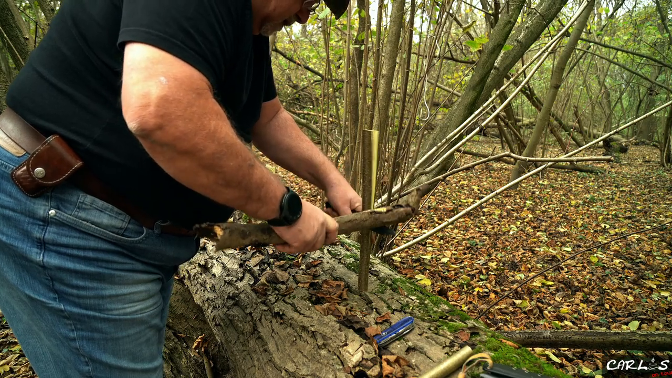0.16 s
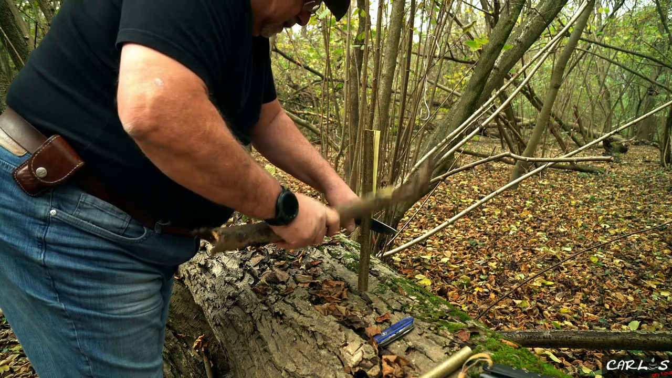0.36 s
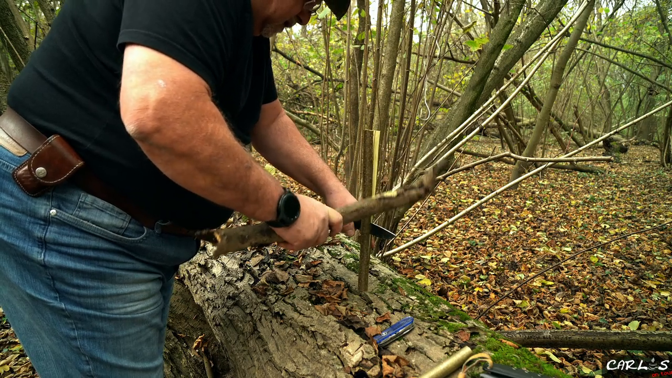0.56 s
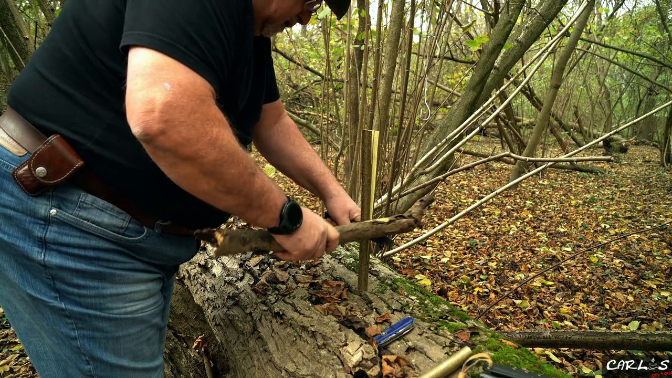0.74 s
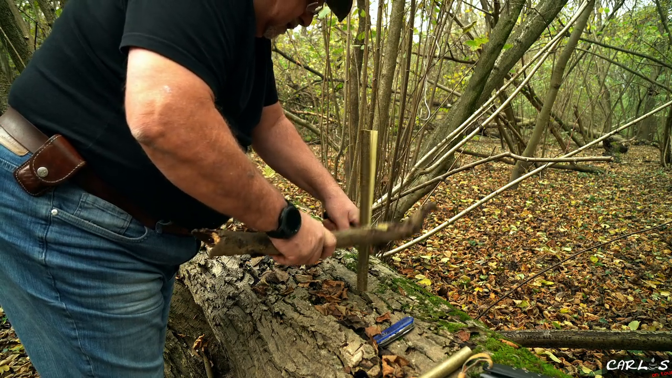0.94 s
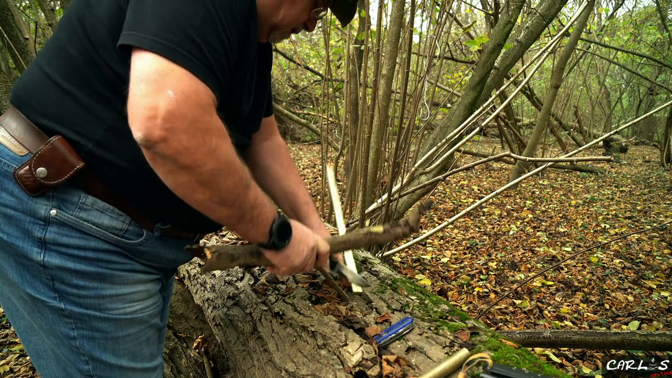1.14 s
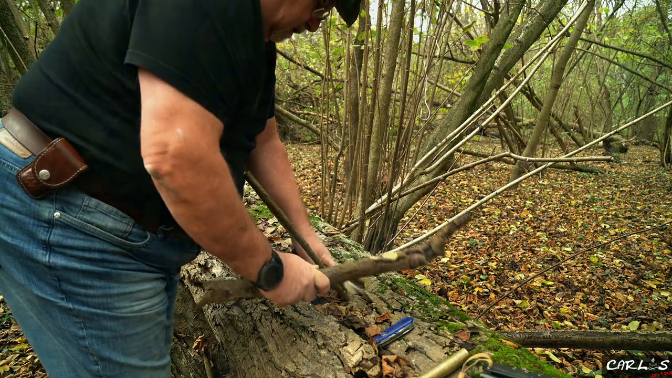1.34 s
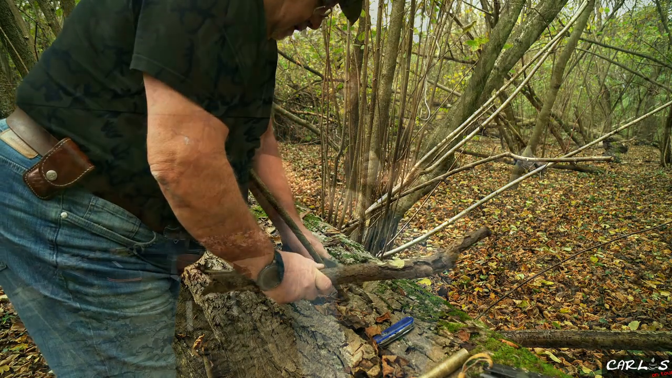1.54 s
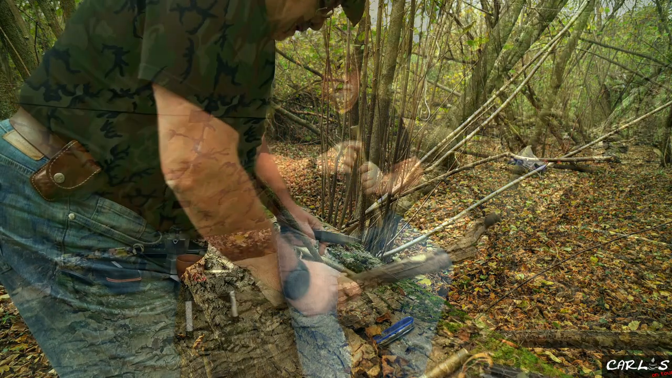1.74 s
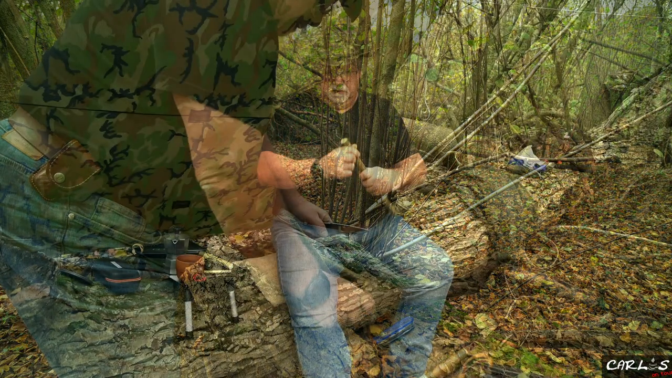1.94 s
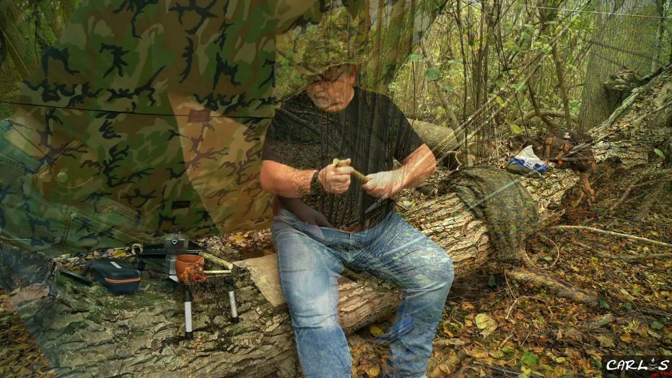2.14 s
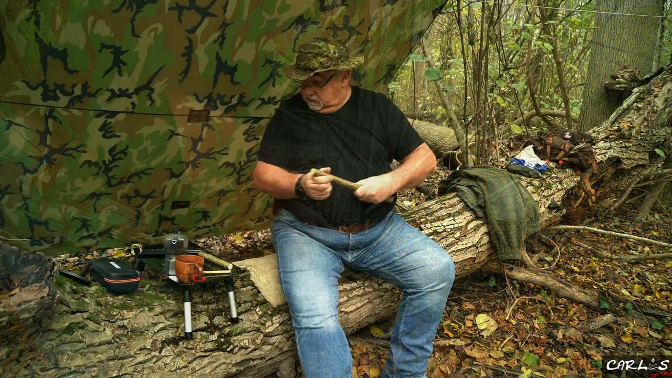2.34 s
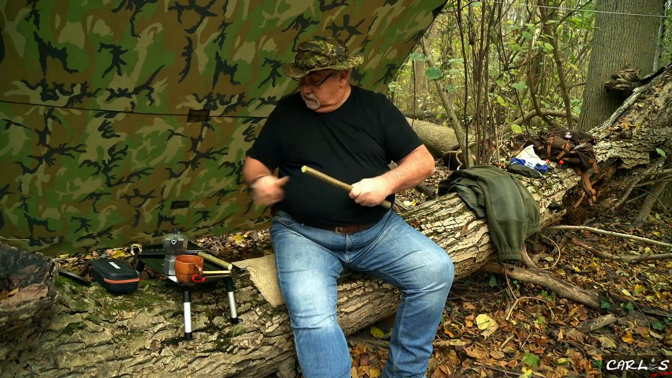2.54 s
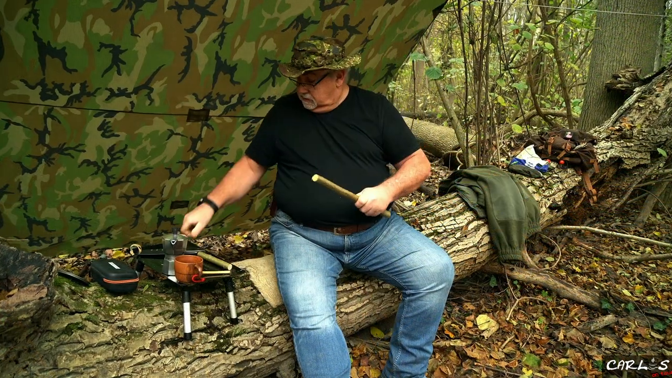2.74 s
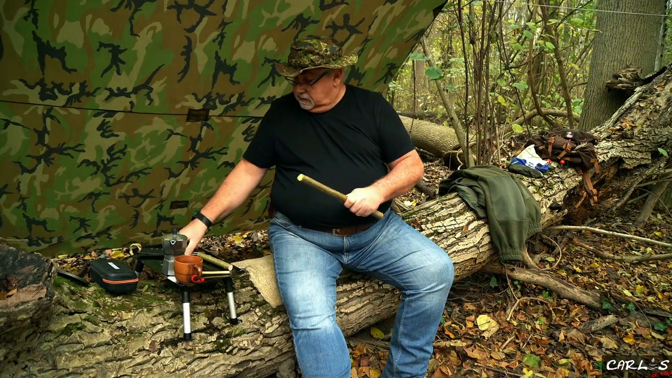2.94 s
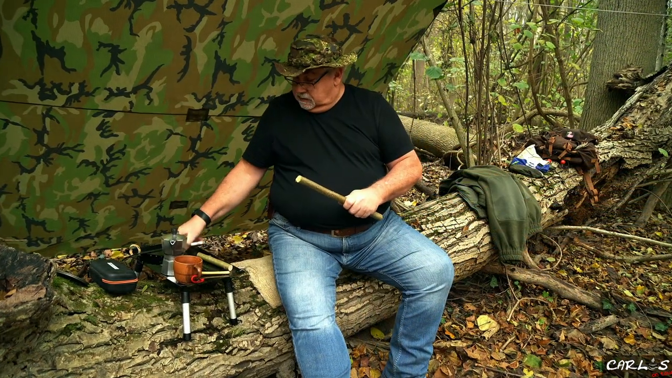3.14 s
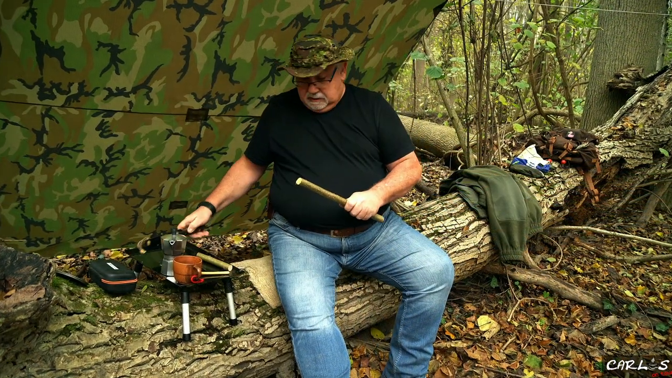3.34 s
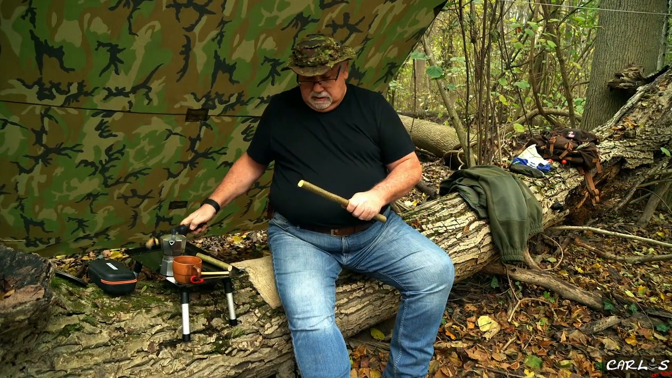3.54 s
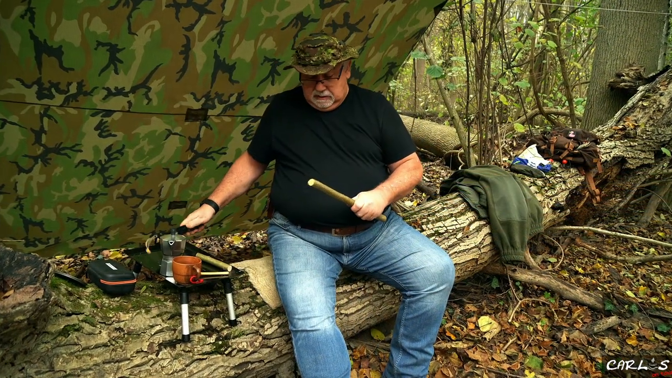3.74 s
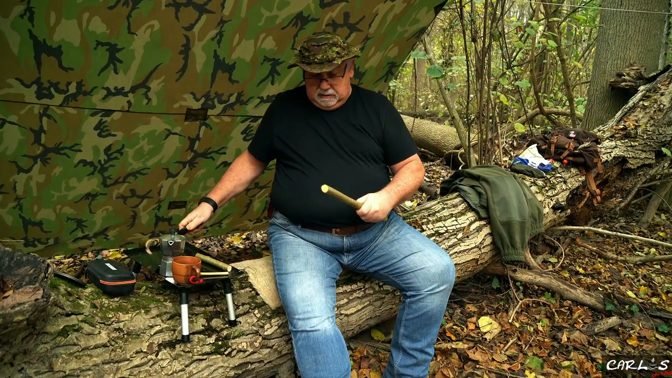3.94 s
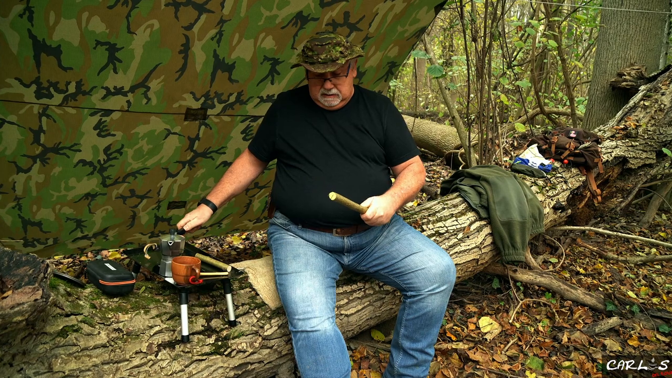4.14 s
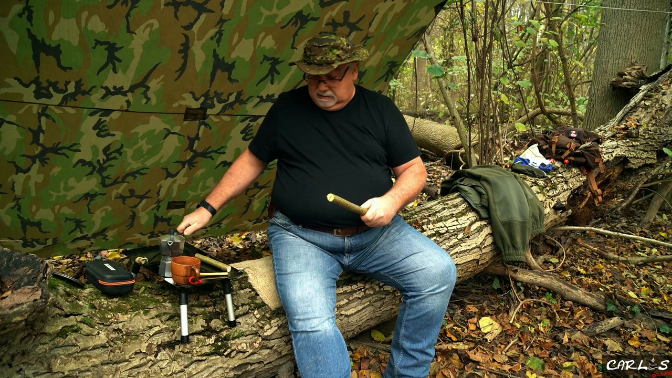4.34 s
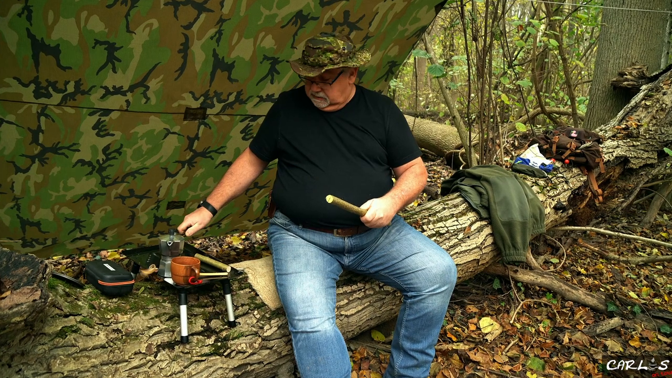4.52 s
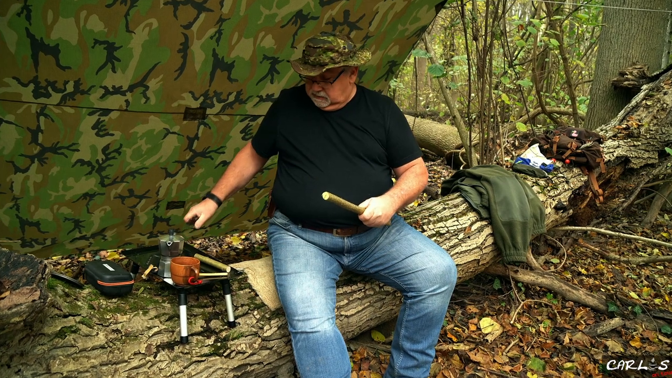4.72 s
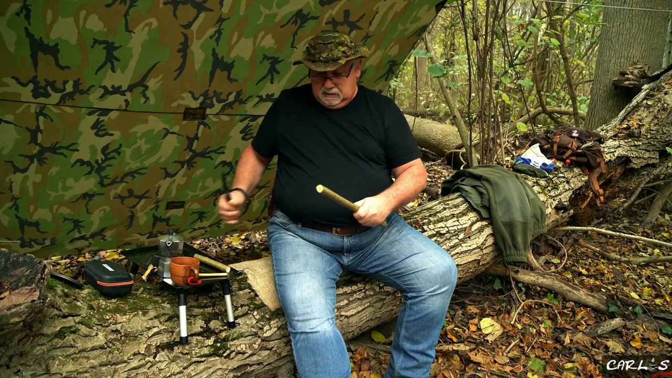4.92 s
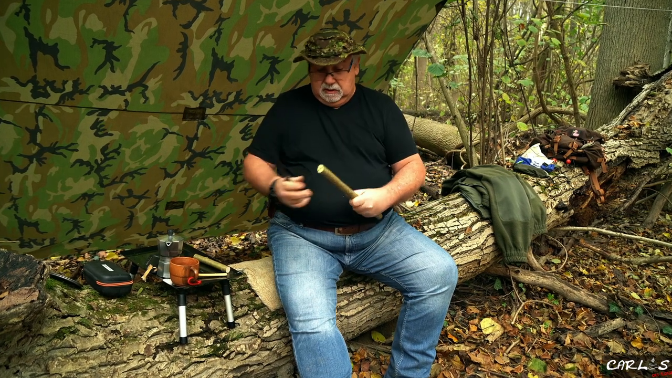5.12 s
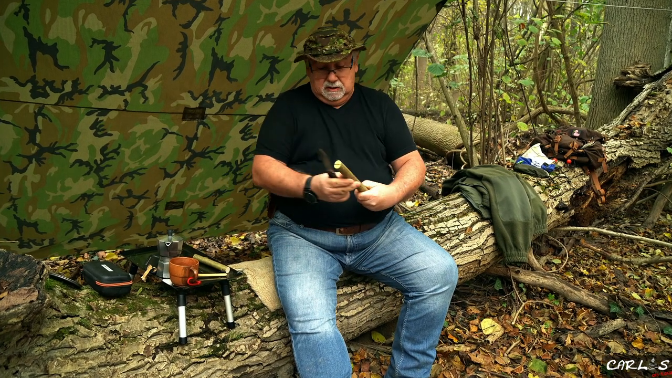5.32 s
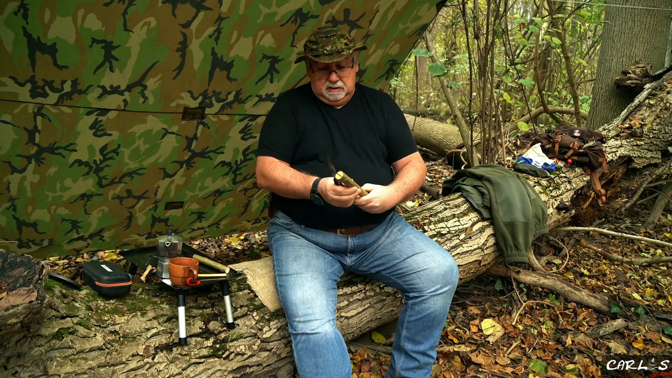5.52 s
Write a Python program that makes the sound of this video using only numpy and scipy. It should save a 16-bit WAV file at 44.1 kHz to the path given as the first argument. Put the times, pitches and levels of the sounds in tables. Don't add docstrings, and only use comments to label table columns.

```python
import sys
import numpy as np
from scipy import signal
from scipy.io import wavfile
from scipy.ndimage import uniform_filter1d

SR = 44100
rng = np.random.default_rng(int(sys.argv[2]) if len(sys.argv) > 2 else 0)


def gain_from_db(level_db):
    decades = np.asarray(level_db, float) / 20
    return 10 ** decades


def int16_out(signal):
    q = np.round(np.clip(np.atleast_2d(signal).T, -1, 1) * 32767)
    wavfile.write(sys.argv[1], SR, q.astype(np.int16))


N = 250039

# hz, width_hz, level_db
BLADE = [
    [(2930, 800, -10.5), (4100, 370, -5.5), (5050, 600, -0.5), (6550, 580, -2.5), (7500, 600, -4),
     (8330, 500, 0), (9400, 600, -12), (11600, 930, -12), (14220, 560, -0.5), (15500, 600, -10.5)],
    [(2260, 1100, -12.5), (4115, 930, -7.5), (5400, 420, -13.5), (6950, 390, 0), (8450, 460, -2),
     (9200, 400, -8.5), (10680, 420, -14.5), (11560, 500, -10.5), (13000, 750, -5), (15020, 600, -6.5)],
    [(2830, 570, -13.5), (3760, 606, -3.5), (5240, 580, -7.5), (6670, 500, 0), (7500, 630, -8.5),
     (9400, 650, -10.5), (11000, 730, -16.5), (12550, 440, -5), (13810, 450, -8), (15400, 800, -5.5)],
    [(2595, 820, -9.5), (3450, 570, -10), (5300, 700, -7), (6460, 600, -2.5), (8260, 600, 2.5),
     (9600, 540, -12), (11380, 990, -13), (13630, 700, -1), (15000, 700, -4)],
]


def evened(x):
    return x / np.sqrt(np.mean(abs(x) ** 2) + 1e-20)


def peaked(x):
    return x / (abs(x).max() + 1e-20)


def read(points, hz):
    f, value = np.transpose(points)
    return np.interp(np.log(hz + 1), np.log(f + 1), value)


def add(mix, start_s, sound):
    part = mix[round(start_s * SR):][:len(sound)]
    part += sound[:len(part)]


def seconds(length_s):
    return np.arange(int(length_s * SR)) / SR


def fall(t, t60_s):
    return gain_from_db(-60 * t / t60_s)


def resonate(x, hz, width_hz):
    hz = min(hz, 0.45 * SR)
    return signal.lfilter(*signal.iirpeak(hz, hz / width_hz, SR), x)


def struck(x, hz, width_hz, level_db):
    steep = resonate(resonate(x, hz, 1.5 * width_hz), hz, 1.5 * width_hz)
    return gain_from_db(level_db) * np.sqrt(width_hz) * evened(steep)


def alternated(parts):
    return sum((-1) ** k * part for k, part in enumerate(parts))


def ring(modes, t):
    return sum(gain_from_db(level_db) * fall(t, t60_s) * np.sin(2 * np.pi * hz * t) for hz, level_db, t60_s in modes)


def grains(size, per_s, spread_db):
    chance, side, force = rng.random((size, 3)).T
    return (chance < per_s / SR) * np.sign(side - 0.5) * gain_from_db(-spread_db * np.log(force + 0.0092))


def shaped(spectrum, patchy_db):
    real, imag, patches = rng.standard_normal((N // 256 + 5, 513, 3)).T
    patches = uniform_filter1d(patches, size=10, axis=0)
    patches = evened(uniform_filter1d(patches, size=12, axis=1))
    colour_db = read(spectrum, np.fft.rfftfreq(1024, 1 / SR))[:, None]
    z = (real + 1j * imag) * gain_from_db(colour_db + patchy_db * patches)
    return evened(signal.istft(z, nperseg=1024, noverlap=768)[1][:N])


def scatter(size, colour=((20, 0), (20000, 0))):
    # hz, t60_s
    band_t60 = [(500, 0.29), (1800, 0.22), (3500, 0.34), (5000, 0.29), (5900, 0.3), (6600, 0.56),
                (7600, 0.5), (9000, 0.28), (13000, 0.28)]
    hz, t, z = signal.stft(rng.standard_normal(size), SR, nperseg=128)
    level_db = read(colour, hz)[:, None] - 60 * t / read(band_t60, hz)[:, None]
    return signal.istft(z * gain_from_db(level_db), SR, nperseg=128)[1][:size]


def woodland_air():
    # hz, level_db_per_hz
    colour = [(20, -1.5), (55, -1.5), (120, -11.5), (200, -17.5), (330, -16.5), (500, -20), (1000, -19),
              (1600, -24.5), (2300, -29), (3800, -27.5), (6000, -36.5), (8200, -35.5), (10300, -44.5),
              (13500, -42), (15600, -42.5), (15900, -63)]
    # time_s, level_db
    swell = [(0, -45.5), (1.4, -48), (2.402, -49.5), (2.799, -45.5), (3.399, -50), (4.2, -48),
             (5.001, -47.5), (5.67, -46.5)]
    # hz, width_hz, level_db
    engine = (61, 21, -62)
    air = gain_from_db(np.interp(np.arange(N) / SR, *np.transpose(swell))) * shaped(colour, patchy_db=1.6)
    hz, width_hz, level_db = engine
    return air + gain_from_db(level_db) * evened(resonate(rng.standard_normal(N), hz, width_hz))


def slap(peak_db, tail_db, steel_db, modes):
    # hz, level_db_per_hz
    return_colour = [(180, -45), (300, -12), (439, 2), (758, -14.5), (1060, -25.5), (1350, -14.5),
                     (1570, -20), (2540, -15.5), (5260, -5), (5910, -8.5), (6860, -1.5), (9240, -7.5),
                     (13500, -18), (15700, -23.5)]
    t = seconds(0.5)
    rattle_s = min(0.0029 - 0.00015 * peak_db, 0.0052)
    rattle = rng.standard_normal(len(t)) * np.minimum(t / 0.0003, 1) * np.exp(-(t / rattle_s) ** 1.3)
    blade = alternated(struck(rattle, *mode) for mode in modes)
    wash = scatter(len(t), return_colour)
    steel = alternated(gain_from_db(level_db + steel_db) * resonate(wash, hz, 0.66 * width_hz)
                       for hz, width_hz, level_db in modes)
    tail = peaked(wash + steel) * (1 - np.exp(-t / 0.0017)) * (1 + 1.2 * np.exp(-t / 0.03))
    return gain_from_db(peak_db) * (peaked(blade) + gain_from_db(tail_db) * tail)


def earlier_slap(mix):
    # ago_s, peak_db, tail_db, steel_db
    blow = (.1, 6, -24, 4)
    ago_s, *levels_db = blow
    add(mix, 0, slap(*levels_db, BLADE[2])[round(ago_s * SR):])


def blade_slaps(mix):
    # start_s, peak_db, tail_db, steel_db
    blows = [
        (0.1824, 4, -24.5, 3),
        (0.4459, 6, -26, 2),
        (0.7124, 6, -26, 4),
        (0.9689, 6, -21.5, 0.5),
        (1.028, -3.5, -26.5, -2),
        (1.0561, -14, -25, 3),
    ]
    for (start_s, *levels_db), modes in zip(blows, BLADE + 2 * BLADE[-1:]):
        add(mix, start_s, slap(*levels_db, modes))


def slides(mix):
    # start_s, length_s, level_db, hz, width_hz
    grinding = [(1.146, 0.0067, -31, 1400, 290), (1.11, 0.014, -38, 600, 510), (1.01, .012, -28, 6300, 500),
                (4.309, 0.0106, -20.5, 1140, 340), (4.264, 0.038, -50, 1080, 270),
                (4.335, 0.027, -43, 3680, 250), (.97, 0.031, -38, 3500, 220),
                (1.008, 0.036, -35.5, 3550, 250), (1.0275, 0.007, -25, 1900, 380),
                (1.056, 0.009, -37, 2300, 230), (1.215, 0.025, -48, 5000, 150),
                (.972, .033, -32, 1300, 1200), (3.205, 0.0122, -39, 3250, 840),
                (4.395, 0.024, -38, 7700, 500), (4.494, 0.0076, -25, 4600, 700),
                (2.95, 0.019, -38, 520, 530)]
    jolts = [
        (.16, 0.095, -45, 70, 80),
        (1.08, .28, -42.5, 60, 70.4),
        (3.02, 0.055, -41, 201, 120),
        (4.25, .12, -54, 60, 60),
        (4.76, 0.041, -51, 219.6, 120),
    ]
    drones = [
        (1.48, .34, -61, 1350, 30),
        (3.55, .7, -62, 335, 60),
        (5.2, .45, -61, 325, 60),
        (0, 5.6, -62, 51, 10),
    ]
    for start_s, length_s, level_db, hz, width_hz in grinding + jolts + drones:
        size = round(length_s * SR)
        band = resonate(resonate(grains(size, 4000, 2.4), hz, width_hz), hz, 2 * width_hz)
        add(mix, start_s, gain_from_db(level_db) * evened(band) * signal.windows.tukey(size, 0.4))


def rubs():
    # hz, level_db_per_hz
    colour = [(530, -24), (900, 5.5), (1660, 3), (1780, 3), (2370, 1), (2980, 2), (4370, -4), (5040, -8),
              (7840, -4), (10300, -15), (12100, -11), (15700, -18)]
    # start_s, length_s, level_db, low_db, swell_db
    strokes = [(0, 0.012, -56, -3, -12), (1.09, 0.043, -41.5, -9, -7.5), (1.144, 0.048, -50, -3, -3.5),
               (1.202, .19, -50.5, 6, 2.5), (1.397, 0.046, -43.5, -1, -8), (1.44, 0.056, -54, 1, 0),
               (1.486, 0.065, -48.5, -1, 11), (1.572, 0.16, -67.5, 7.5, -6.5),
               (1.827, 0.027, -63, -14.5, 5), (1.886, 0.074, -48.5, -6.5, 5), (1.971, 0.064, -60.5, -6, 3),
               (2.035, 0.1103, -46, -2, 11.5), (2.173, 0.1, -64, -6, 0), (2.241, 0.0785, -47.5, -8, 4),
               (2.332, 0.17, -59, -14, 3.5), (2.95, 0.235, -69.5, 19, -5), (3.2, 0.096, -64, -12, -5)]
    # start_s, length_s, level_db, low_db, swell_db
    rustles = [(3.433, 0.034, -56.5, -24, 6), (3.52, 0.037, -62.5, -12.5, 3), (3.796, 0.043, -56, -6, -4.5),
               (3.975, 0.057, -61.5, -19.5, 7.5), (4.109, .07, -64, -6, -10.5), (4.234, 0.05, -62.5, 5, 2),
               (4.315, .045, -49, -10, 0), (4.4, 0.044, -49, -10, -8), (4.47, .02, -58, -10, 0),
               (4.545, .03, -54, -10, -6), (1.03, 0.024, -44, 2, -3), (4.701, 0.081, -73.5, 22.5, 6.5),
               (4.802, 0.088, -59.5, -16, 6), (4.986, 0.018, -64.5, 2, 0), (5.174, 0.077, -62.5, 5, 8),
               (5.253, .14, -57.5, -2, -4), (5.443, .015, -60.5, 1.5, -1), (5.51, 0.11, -62, 5.5, -4),
               (5.622, 0.058, -53, -5.5, 11)]
    grip_s, lift_t60_s = 0.013, 0.073
    grit = shaped(colour, patchy_db=2.2)
    grit = grit * (1 + 0.5 * abs(evened(uniform_filter1d(grains(N, 400, 4), size=60))))
    low = signal.sosfilt(signal.butter(4, 4500, fs=SR, output="sos"), grit)
    high = signal.sosfilt(signal.butter(4, 4500, "high", fs=SR, output="sos"), grit)
    low_level, high_level = np.zeros((2, N))
    for start_s, length_s, level_db, low_db, swell_db in strokes + rustles:
        t = np.arange(0, length_s + lift_t60_s, 1 / SR)
        swell = gain_from_db(level_db + swell_db * (np.minimum(t / length_s, 1) - 0.5))
        level = np.minimum(t / grip_s, 1) * swell * fall(np.maximum(t - length_s, 0), lift_t60_s)
        add(high_level, start_s, level)
        add(low_level, start_s, level * gain_from_db(low_db))
    return high_level * evened(high) + low_level * evened(low)


def knock(peak_db, tilt_db, rise_s, t60_s, thump_db):
    # hz, width_hz, level_db
    gear = [(556, 140, -1.5), (842, 375, 10), (1163, 110, 8.5), (1460, 1220, 2.5), (2250, 480, 5),
            (2920, 1080, -1), (3670, 350, 2), (4182, 690, -3.5), (5360, 1700, -13.5), (5900, 1100, -7.5),
            (7610, 670, -9), (8160, 1000, -11.5), (10150, 1200, -20.5), (13200, 2400, -19)]
    t = seconds(0.2)
    shower = evened(grains(len(t), 8000, 2.6)) * (1 - np.exp(-(t / rise_s) ** 2))
    shower[round(rise_s * SR)] += 9 * np.exp(-rise_s / 0.0034)
    hz, width_hz, level_db = np.transpose(gear)
    held_hz = hz * rng.uniform(0.93, 1.134, len(gear))
    heavy_db = (thump_db + 12) * np.clip(np.log2(1100 / hz), 0, 1)
    level_db = level_db + tilt_db * np.log2(np.minimum(hz, 7000) / 1500) + heavy_db
    decay_s = t60_s * (1500 / np.minimum(hz, 6000)) ** 0.45
    clack = alternated(struck(shower * fall(t, d), f, w, db) * np.sqrt(d)
                       for f, w, db, d in zip(held_hz, width_hz, level_db, decay_s))
    thump = struck(shower * fall(t, t60_s), 250, 130, 0)
    return gain_from_db(peak_db) * (peaked(clack) + gain_from_db(thump_db) * peaked(thump))


def knocks(mix):
    # start_s, peak_db, tilt_db_per_octave, rise_s, t60_s
    tumble = [(.974, -21.5, 7, 0.0019, 0.36), (0.9975, -16, 0, 0.0011, 0.028),
              (1.0002, -13, 2, 0.00056, .03), (1.0102, -20.5, 7.5, 0.0018, 0.14),
              (1.093, -37, -7, 0.0011, .035), (1.116, -22, 1.5, .00067, 0.051),
              (1.16, -25, -0.5, 0.00048, 0.028), (1.166, -26, 13.5, 0.0026, .12),
              (1.339, -18, 8, 0.006, 0.09), (1.398, -35.5, -4, 0.0016, 0.08), (1.54, -46, -11, 0.0017, .11)]
    set_down = [
        (2.949, -31, -8, .00091, 0.1),
        (2.989, -28, -1, .001, 0.074),
        (3.0272, -14, -5, 0.0031, 0.064),
        (3.034, -18, -2.5, 0.0018, 0.052),
        (3.045, -23, -2.5, .003, 0.047),
        (3.107, -25, 6, 0.00077, 0.023),
        (3.114, -17.5, 3, .001, 0.038),
        (3.2055, -26.5, 8, .0002, .05),
        (3.155, -35, 5, .001, 0.025),
    ]
    rummage = [(4.263, -37, 8, .001, 0.11), (4.3027, -23.5, 2.5, 0.0011, 0.055),
               (4.3061, -18.5, 5, 0.00048, 0.033), (4.3107, -13, 10, 0.00052, 0.038),
               (4.313, -16, 4, 0.00057, .08), (4.336, -33, 6.5, 0.0008, 0.08), (4.35, -24, -6, 0.0021, .2),
               (4.3646, -0.5, 7.5, 0.00035, .03), (4.368, -4.5, 5, 0.00056, 0.084),
               (4.385, -10, 5, .0005, 0.053), (4.3892, -3.5, 0.5, .0015, 0.067),
               (4.3935, -4.5, 1.5, 0.00048, 0.094), (4.403, -19.5, -1, 0.0029, 0.2),
               (4.4598, -6, 6.5, 0.0003, 0.033), (4.4634, -8, -0.5, 0.00034, 0.089),
               (4.469, -14, 3, .0006, 0.05), (4.4932, -8.5, 2, 0.00034, 0.072),
               (4.498, -13, 1, 0.00066, .05), (4.505, -15, -8, 0.0023, 0.037),
               (4.5085, -2.5, 8.5, .00035, 0.057), (4.5128, -2, 3.5, .00042, 0.063),
               (4.5169, -7, 3, 0.00092, 0.092), (4.524, -17, -9, 0.0024, .035),
               (4.5352, -2, 4, .0003, 0.05), (4.539, -4.5, 1, .001, 0.07),
               (4.5783, -14.5, 2.5, 0.00071, .15), (4.586, -10.5, 0, 0.0029, 0.14),
               (4.596, -10.5, 0.5, 0.0022, 0.081), (4.6047, -8.5, 2, 0.00055, 0.067),
               (4.611, -16, -2, .002, 0.085), (4.769, -26.5, -5, 0.0012, 0.075),
               (4.272, -37.5, 8.5, 0.011, 0.28)]
    cracks = [
        (1.256, -15, -6, .001, 0.13),
        (.7062, -16, 8.5, 0.0016, 0.017),
        (.617, -48, 14, 0.00083, .04),
        (1.2541, -7, -1, .0002, .015),
        (.001, -36, 8, .001, .05),
    ]
    # full_force_db, db_per_db_force, db_per_db_tilt
    weight = [
        (-14, -0.23, 0.5),
        (-39.5, -0.7, -0.6),
        (-24.5, 0.22, -0.23),
        (-13.5, 1.24, -4.5),
    ]
    for events, (full_db, per_force, per_tilt) in zip((tumble, set_down, rummage, cracks), weight):
        for start_s, peak_db, tilt_db, rise_s, t60_s in events:
            thump_db = full_db + per_force * peak_db + per_tilt * tilt_db
            add(mix, start_s, knock(peak_db, tilt_db, rise_s, t60_s, thump_db))


def bird_chirps(mix):
    # start_s, length_s, level_db, top_hz
    calls = [
        (.119, .032, -62, 2460),
        (.641, .032, -62, 2450),
    ]
    for start_s, length_s, level_db, top_hz in calls:
        u = np.linspace(-1, 1, round(length_s * SR))
        phase = 2 * np.pi * np.cumsum(top_hz * (1 - 0.19 * u ** 2)) / SR
        whistle = np.sin(phase) + gain_from_db(1) * np.sin(2 * phase)
        add(mix, start_s, gain_from_db(level_db + 3) * whistle * signal.windows.tukey(len(u), 0.6))


def ticks(mix):
    # start_s, peak_db, centre_hz
    events = [(0.1436, -40, 8600), (.817, -42, 10500), (.886, -46.5, 9070), (1.7746, -41, 8800),
              (1.9839, -36.5, 3270), (2.0433, -39, 7850), (2.1111, -25, 6130), (2.1274, -22.5, 8510),
              (2.145, -30, 8320), (2.3654, -40, 13500), (2.424, -44, 5900), (2.4632, -26, 7870),
              (2.467, -23, 7900), (2.4744, -21.5, 7490), (2.478, -29.5, 7500), (2.4886, -36, 7960),
              (3.5314, -41.5, 4600), (3.706, -47, 2580), (3.807, -45, 5300), (4.013, -45, 7000),
              (4.1198, -45.5, 3090), (1.0325, -14, 7400), (1.1595, -31, 3300), (1.1165, -29, 4600),
              (1.011, -22, 6000), (1.0195, -22, 5600)]
    t = seconds(1 / 30)
    for start_s, peak_db, hz in events:
        burst = rng.standard_normal(len(t)) * (fall(t, 0.0063) + 0.053 * fall(t, 0.027))
        tone = resonate(resonate(burst, hz, 0.12 * hz), hz, 0.38 * hz)
        add(mix, start_s, gain_from_db(peak_db) * peaked(tone + 0.21 * resonate(burst, 8000, 9000)))


def log_thuds(mix):
    # start_s, peak_db, pulse_hz, ring_db, splinter_db
    blows = [(.1701, 0, 830, -8, -13.5), (.4349, -0.5, 900, -9, -11.5), (.6998, 0, 874, -8.5, -16),
             (.9571, -3.5, 830, -5.5, -15.5), (1.1068, -12, 714, -23, -16), (1.1462, -19.5, 850, -0.5, -8),
             (1.2535, 1.5, 945, -11.5, -35), (1.3655, -7.5, 730, -8.5, -23), (1.073, -30, 500, 7, -20),
             (1.058, -25.5, 450, 0, -20), (1.246, -31, 900, -15, -21)]
    # hz, level_db, t60_s
    log_modes = [(361, 6, 0.031), (730, 1, 0.024), (1093, -5, 0.024), (1507, 0.5, 0.021), (256, -11, 0.082)]
    t = seconds(0.125)
    wood = peaked(ring(log_modes, t) * (1 - np.exp(-(t / 0.0011) ** 2)))
    for start_s, peak_db, hz, ring_db, splinter_db in blows:
        turns = t * hz - 0.63
        contact = 0.5 + 0.5 * np.tanh(turns / 0.05)
        push = -np.cos(2 * np.pi * (turns - 0.11)) * np.exp(-((turns - 0.4) / 0.64) ** 2) * contact
        push += 0.14 * (1 - contact) * np.minimum(3 * t * hz, 1)
        splinters = resonate(rng.standard_normal(len(t)), 1700, 5000) * fall(t, 0.045)
        splinters *= np.minimum(t * hz / 0.8, 1) ** 2
        thud = peaked(push) + gain_from_db(ring_db) * wood + gain_from_db(splinter_db) * splinters
        add(mix, start_s, gain_from_db(peak_db) * thud)


def split_stutters(mix):
    # start_s, length_s, level_db, slips_per_s
    events = [
        (.971, .032, -24, 258),
    ]
    # hz, width_hz, level_db
    wood_modes = [(1285, 70, -3), (1550, 70, 0), (1920, 90, -9), (2410, 90, -13), (3480, 100, -12)]
    for start_s, length_s, level_db, per_s in events:
        size = round(length_s * SR)
        drift = 1 + 0.012 * evened(uniform_filter1d(rng.standard_normal(size), size=100))
        slips = np.diff(np.floor(np.cumsum(per_s * drift) / SR), prepend=0)
        wood = sum(struck(slips + 0.04 * rng.standard_normal(size), *mode) for mode in wood_modes)
        add(mix, start_s, gain_from_db(level_db) * evened(wood) * signal.windows.tukey(size, 0.3))


def stick_bounces(mix):
    # start_s, peak_db, favoured_hz, breadth_octaves, damping_factor
    bounces = [
        (1.231, -18.5, 2560, 0.81, 1.3),
        (1.255, -22.5, 3420, .12, 0.86),
        (1.2548, -11.5, 2820, 0.19, 1.44),
        (1.255, -22, 780, 1.1, 1.4),
        (1.317, -22.5, 3900, 0.22, 1.4),
        (1.3665, -14.5, 1590, 0.66, 1.2),
        (1.399, -28, 810, 1, 3),
        (1.06, -22, 1940, 0.95, 2.3),
        (1.057, -21, 4200, .35, 1.3),
        (.975, -24, 2900, 0.28, 0.68),
    ]
    # hz, level_db, t60_s
    stick = [(225, 4, .3), (298, 14, 0.38), (516, 2.5, 0.36), (545, 5, 0.4), (676, 2, .25), (838, 5, 0.31),
             (1060, 4, .09), (1350, 1, 0.23), (1680, 7, 0.16), (2350, -9.5, 0.2), (2715, -2, 0.11),
             (3390, 3, 0.076), (4560, -1, 0.073)]
    t = seconds(1 / 3)
    for start_s, peak_db, favoured_hz, breadth, damping in bounces:
        modes = [(hz, level_db - 6 * (np.log2(hz / favoured_hz) / breadth) ** 2, t60_s / damping)
                 for hz, level_db, t60_s in stick]
        waver = 1 + 0.1 * evened(uniform_filter1d(rng.standard_normal(len(t)), size=200))
        add(mix, start_s, gain_from_db(peak_db) * peaked(ring(modes, t)) * waver)


def hard_snaps(mix):
    # start_s, peak_db, top_hz
    snaps = [
        (1.2546, -4, 3000),
        (4.3362, -26, 6000),
        (4.4929, -14, 5000),
        (4.5353, -10, 4000),
        (4.384, -18, 6000),
        (4.3905, -12, 5000),
    ]
    for start_s, peak_db, top_hz in snaps:
        u = seconds(1 / 200) * 2 * np.pi * top_hz
        add(mix, start_s, gain_from_db(peak_db) * (1 - u) * np.exp(-u))


def metal_rings(mix):
    # start_s, level_db, hz, t60_s
    rings = [
        (1.368, -44, 1350, 1.2),
        (4.621, -50, 2449, 0.87),
    ]
    t = seconds(0.5)
    for start_s, level_db, hz, t60_s in rings:
        add(mix, start_s, ring([(hz, level_db, t60_s)], t) * signal.windows.tukey(len(t), 0.2))


def latch_clicks(mix):
    # start_s, peak_db, t60_s
    clicks = [
        (3.1076, 0, .025),
        (3.1109, -4, 0.029),
    ]
    # hz, width_hz, level_db
    latch = [(1090, 370, -4), (2010, 520, -0.5), (2900, 670, -6), (3900, 780, -2), (4910, 900, -8.5),
             (6900, 1200, -16.5), (8400, 900, -16), (10500, 1500, -31), (13000, 1800, -27)]
    t = seconds(0.1)
    for start_s, peak_db, t60_s in clicks:
        chatter = 0.073 * rng.standard_normal(len(t)) * fall(t, t60_s)
        chatter[0] = 1
        add(mix, start_s, gain_from_db(peak_db) * peaked(alternated(struck(chatter, *mode) for mode in latch)))


def scene():
    near = np.zeros(N)
    for source in (blade_slaps, slides, knocks, bird_chirps, ticks, log_thuds, split_stutters,
                   stick_bounces, hard_snaps, metal_rings, latch_clicks):
        source(near)
    trees = np.pad(scatter(SR // 4), (300, 0))
    near += gain_from_db(-26) * signal.oaconvolve(near, trees / np.linalg.norm(trees))[:N]
    near += rubs()
    earlier_slap(near)
    return (near + woodland_air())[None]


def band_limit(x):
    return signal.sosfilt(signal.butter(12, 16430, fs=SR, output="sos"), x)


def record(dry):
    clipped = np.clip(dry, -0.97, 0.97)
    lowpass = signal.firwin(191, 16200, window=("kaiser", 7), fs=SR)
    limited = signal.oaconvolve(clipped, lowpass[None], "same")
    return band_limit(limited)


dry = scene()
out = record(dry)
int16_out(out)
```